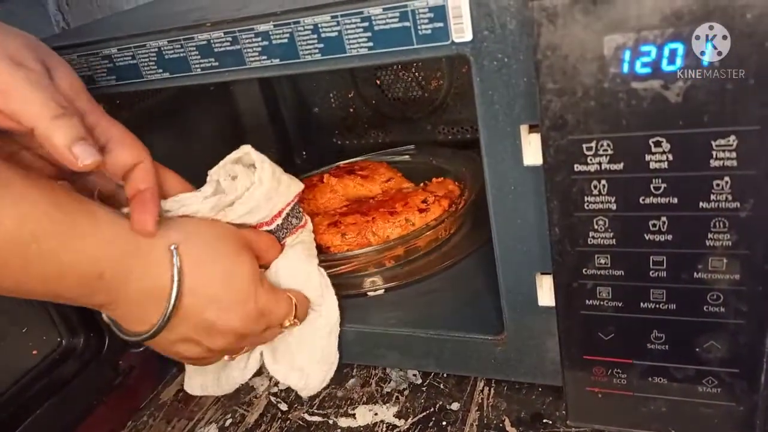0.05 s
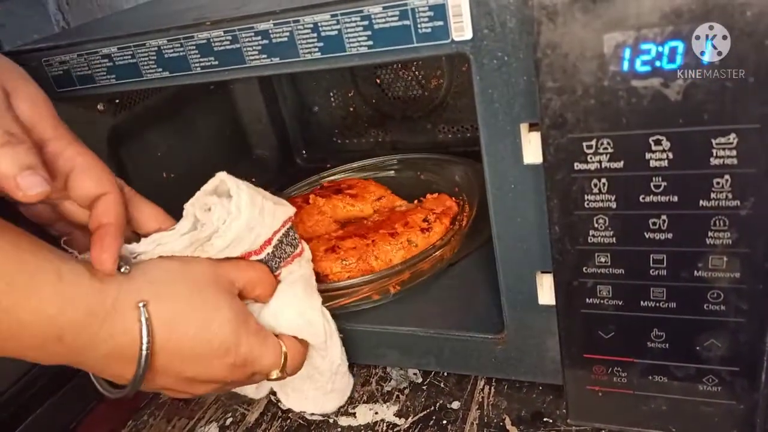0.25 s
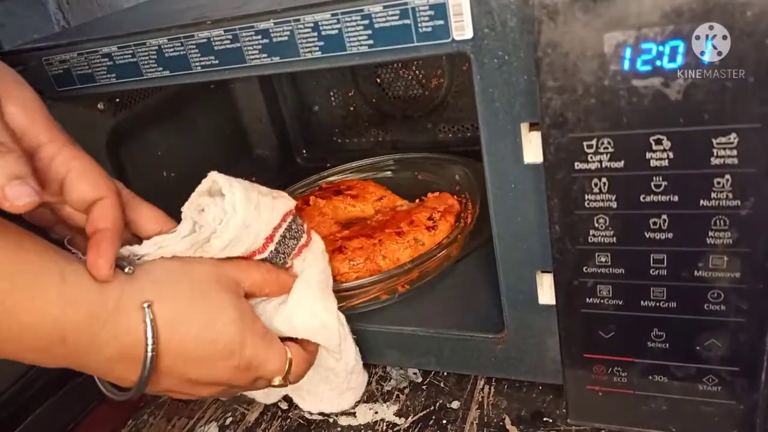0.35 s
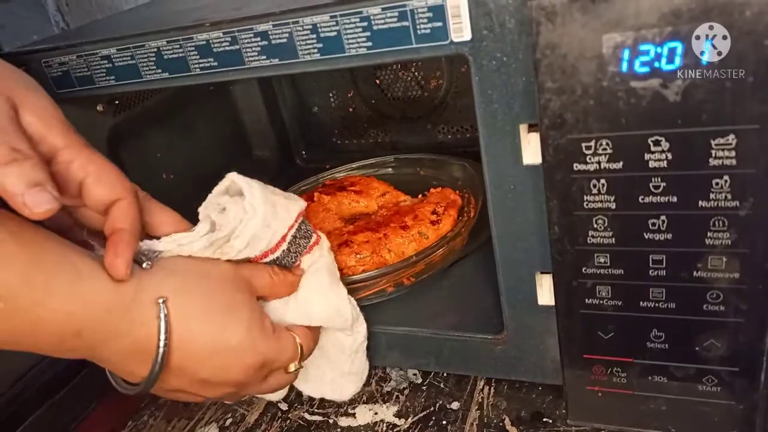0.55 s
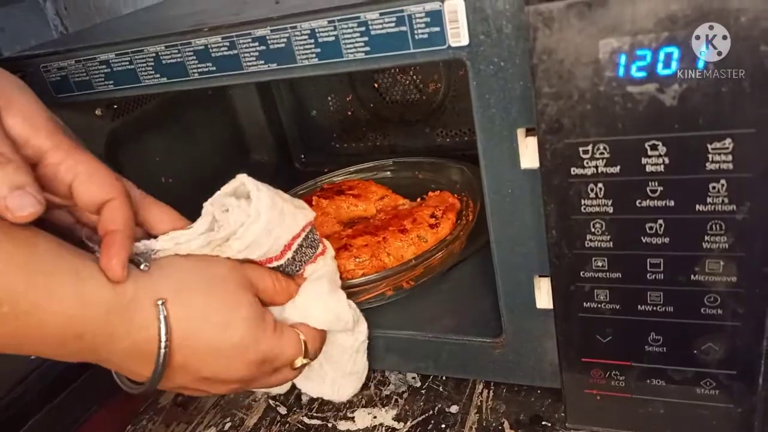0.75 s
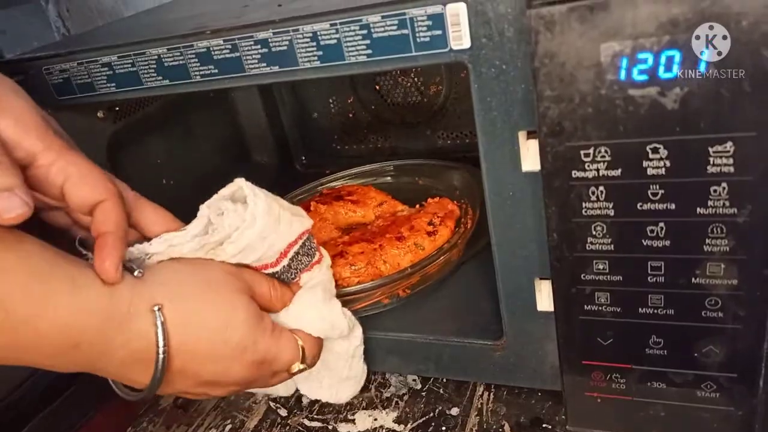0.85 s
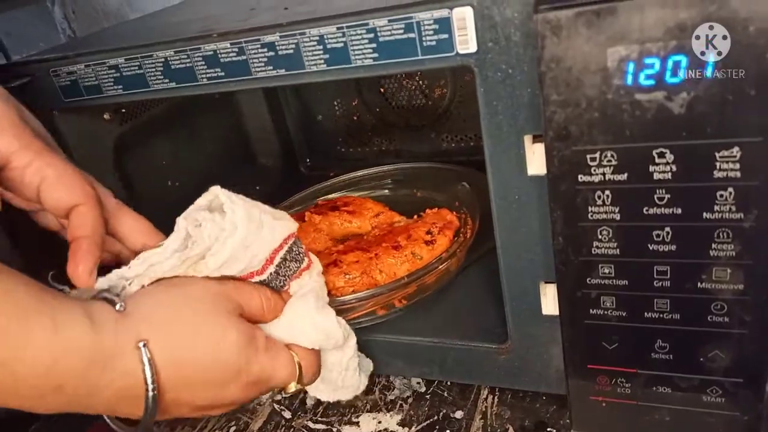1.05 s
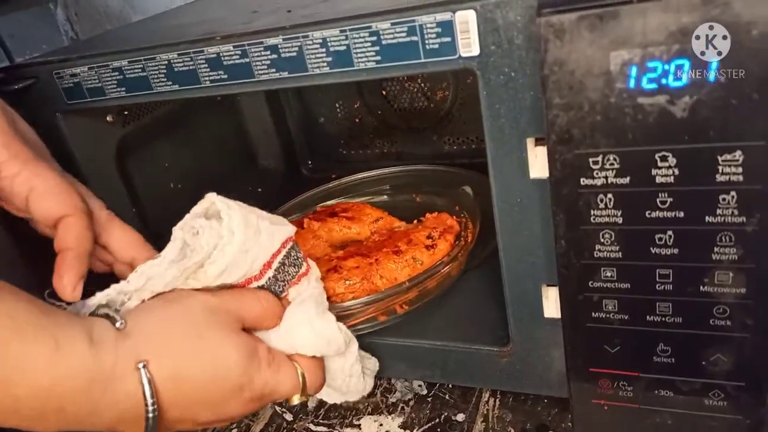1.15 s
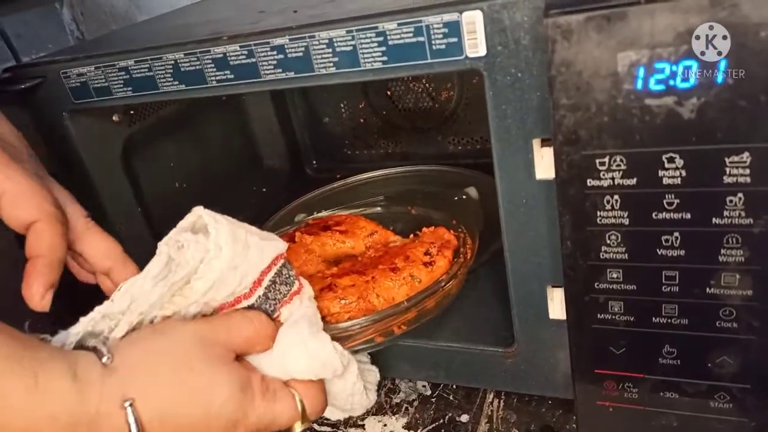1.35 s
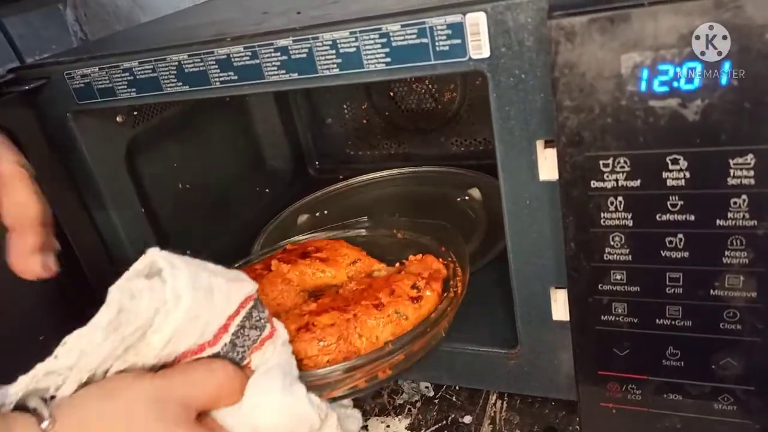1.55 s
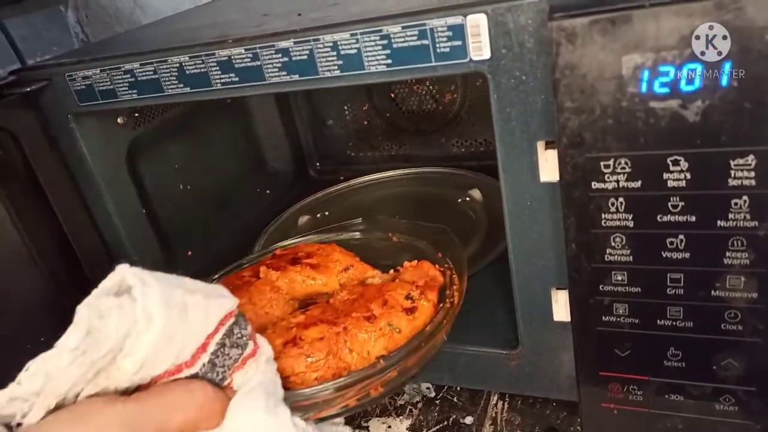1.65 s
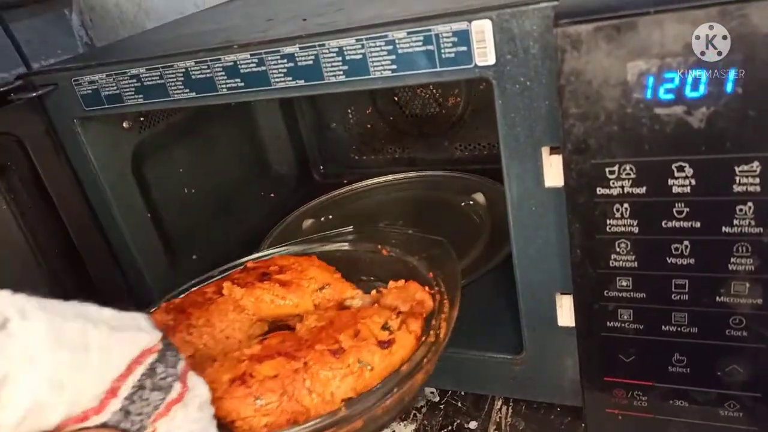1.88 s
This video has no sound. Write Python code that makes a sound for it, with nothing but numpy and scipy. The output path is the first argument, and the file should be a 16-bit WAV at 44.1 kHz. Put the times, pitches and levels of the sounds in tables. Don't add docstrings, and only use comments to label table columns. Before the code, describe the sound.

A sharp, hard clack in a kitchen, then a glass dish scrapes and knocks on an oven sill

```python
import sys
import numpy as np
from scipy import signal
from scipy.fft import rfft, irfft
from scipy.io import wavfile
from scipy.ndimage import uniform_filter1d

SR = 44100
rng = np.random.default_rng(int(sys.argv[2]) if len(sys.argv) > 2 else 0)


def volts_from_db(level):
    exponent = np.asarray(level, float) / 20
    return 10 ** exponent


def unload_wav(signal):
    wavfile.write(
        sys.argv[1],
        SR,
        np.round(np.clip(np.atleast_2d(signal).T, -1, 1) * 32767).astype(np.int16),
    )


N = 83790

RISE_S = 0.00083

# f/Hz, density/[dB per Hz]
HARD_CRACK = [(250, -28), (570, 0), (5100, -2.5), (8400, -15), (9000, -29), (11000, -22), (12800, -13),
              (15000, -46)]


def evened(x):
    return x / np.sqrt(np.mean(x ** 2) + 1e-20)


def read(points, hz):
    f, value = np.transpose(points)
    return np.interp(np.log(hz + 1), np.log(f + 1), value)


def colour(points):
    db = read(points, np.fft.rfftfreq(4096, 1 / SR))
    both_sides_db = np.r_[db, db[-2:0:-1]]
    log_gain = np.log(volts_from_db(np.maximum(both_sides_db, -100)))
    phase = -signal.hilbert(log_gain).imag
    return np.fft.ifft(np.exp(log_gain + 1j * phase)).real[:1024]


def ring(modes):
    twin_spread, twin_db, longest_t60_s = 0.034, -12.5, 0.84
    t = np.arange(SR // 2) / SR
    detune = twin_spread * rng.uniform(0.35, 1, len(modes)) * rng.choice([-1, 1], len(modes))
    total = 0
    for (hz, db, t60_s), shift in zip(modes, detune):
        main = np.sin(2 * np.pi * hz * t)
        twin = volts_from_db(twin_db) * np.sin(2 * np.pi * hz * (1 + shift) * t)
        decay = volts_from_db(db - 60 * t / np.clip(t60_s, 0.01, longest_t60_s))
        total = total + decay * (main + twin)
    return (1 - np.exp(-t / RISE_S)) * total


def hits(contacts, modes, crack, crack_db):
    rough_share, ring_send_db = 0.59, -3.5
    t = np.arange(N) / SR
    noise = rng.standard_normal(N)
    click, wake = np.zeros(N), np.zeros(N)
    for s, db, length_s in contacts:
        age = np.maximum(t - s, 0)
        envelope = (1 - np.exp(-age / RISE_S)) * np.exp(-age / length_s)
        wake += volts_from_db(db) * noise * envelope / np.sqrt(length_s * SR)
        click += volts_from_db(db) * np.sinc((t - s) * SR)
    body, edge = ring(modes), colour(crack)
    push = click + rough_share * wake
    rung = signal.fftconvolve(push, body / abs(body).max())[:N]
    cracked = signal.fftconvolve(wake, volts_from_db(crack_db) * 3 * edge / np.linalg.norm(edge))[:N]
    return np.array([rung + cracked, volts_from_db(ring_send_db) * rung + cracked])


def pressed(curve):
    s, db = np.transpose(curve)
    return volts_from_db(np.interp(np.arange(N) / SR, s, db, -99, -99))


def friction(curve, peaks, slips_per_s, spread_db):
    draw = rng.random((N, 3))
    happens = draw[:, 0] < slips_per_s / SR
    strength = volts_from_db(-spread_db * np.log(draw[:, 2] + 0.024))
    slips = happens * np.sign(draw[:, 1] - 0.5) * strength
    t = np.arange(SR // 4) / SR
    body = 0
    for hz, width_hz, db in peaks:
        decay = np.exp(-np.pi * width_hz * t)
        body = body + volts_from_db(db) * np.sqrt(width_hz) * decay * np.sin(2 * np.pi * hz * t)
    return evened(signal.fftconvolve(slips, body)[:N]) * pressed(curve)


def hum():
    # f/Hz, density/[dB per Hz]
    spectrum = [(45, -7), (62, 21.5), (100, -1.6), (300, -3.5), (900, -8.5), (2200, -18.5), (4000, -24),
                (9000, -30)]
    # f/Hz, likeness/[0..1]
    likeness = [(30, 0.31), (100, 1), (400, 0.85), (1500, 0.24), (5000, 0.18), (12000, 0.12)]
    level_db, lead_samples = -45.5, 19.63
    frames, hz = N // 256 + 5, np.fft.rfftfreq(1024, 1 / SR)
    a, b, c, d, patches = rng.standard_normal((frames, 513, 5)).T
    patches = uniform_filter1d(patches, size=10, axis=0)
    patches = evened(uniform_filter1d(patches, size=12, axis=1))
    same = np.clip(read(likeness, hz), -1, 1)[:, None]
    left, other = a + 1j * b, c + 1j * d
    lag = np.exp(-2j * np.pi * hz * lead_samples / SR)[:, None]
    z = np.array([left, same * left * lag + np.sqrt(1 - same ** 2) * other])
    z = z * volts_from_db(read(spectrum, hz)[:, None] + 1.3 * patches)
    return volts_from_db(level_db) * evened(signal.istft(z, nperseg=1024, noverlap=768)[1][:, :N])


def cabinet():
    # t/s, level/dB
    load = [(0.0, -36), (0.026, -38.5), (0.074, -47.5), (0.232, -40), (0.285, -29.5), (0.345, -31),
            (0.432, -41.5), (0.608, -43), (0.792, -52.5), (1.01, -46), (1.068, -38.5), (1.18, -51.5),
            (1.2, -38), (1.444, -50), (1.476, -34.5), (1.528, -44), (1.624, -66), (1.9, -47.5)]
    # f/Hz, width/Hz, level/dB
    panels = [(221, 22, 3.5), (256.3, 8.3, -0.2), (327, 92, 2), (470, 110, 1), (538, 28, -9.5),
              (597, 55, -5), (779, 57, -6)]
    # t/s, peak/dB, contact/s
    thumps = [(0.003, -24.5, 0.0031), (0.024, -30.5, 0.0016), (0.238, -25.5, 0.0028), (0.256, -24, 0.0049),
              (0.29, -24.5, 0.0039), (0.304, -21.5, 0.0056), (.331, -20.5, 0.0028), (0.352, -30.5, 0.0041),
              (.385, -45, 0.0024), (1.066, -43.5, 0.0026)]
    # f/Hz, level/dB, t60/s
    thump_modes = [(253.8, 11, 0.13), (351, -8.5, 0.15), (500, -4.5, 0.085), (597, 5.5, 0.11),
                   (850, -14.5, 0.066)]
    # t/s, peak/dB, contact/s
    landings = [(.575, -35.5, .01), (.61, -38.5, 0.011), (1.09, -36, 0.0023), (1.199, -35.5, 0.0036),
                (1.303, -40.5, 0.0081), (1.471, -37, 0.002)]
    # f/Hz, level/dB, t60/s
    floor_modes = [(500, -0.2, 0.64), (612, -3, 0.48)]
    rumble = friction(load, panels, 2500, 0.78)
    rumble = rumble + hits(thumps, thump_modes, HARD_CRACK, -66)
    return rumble + hits(landings, floor_modes, HARD_CRACK, -31.5)


def slide():
    # t/s, pressure/dB
    pressure = [(0.1, -57), (0.15, -49.5), (0.175, -40), (0.194, -42.5), (0.21, -36.5), (0.228, -40),
                (0.25, -30), (0.272, -38.5)]
    # first f/Hz, last f/Hz, width/Hz, level/dB
    glides = [(690, 625, 30, 3), (1100, 1170, 30, -2), (1450, 1450, 120, -16), (1950, 1900, 400, -12),
              (2470, 2400, 300, -16), (3500, 3500, 500, -18)]
    t, total = np.arange(N) / SR, 0
    start_end_s = np.transpose(pressure)[0][[0, -1]]
    slips = rng.standard_normal(N) ** 3
    for first_hz, last_hz, width_hz, db in glides:
        hz = np.interp(t, start_end_s, [first_hz, last_hz])
        turn = np.exp(2j * np.pi * np.cumsum(hz) / SR)
        r = np.exp(-np.pi * width_hz / SR)
        swing = signal.lfilter([1], [1, -2 * r, r * r], slips / turn)
        total = total + volts_from_db(db) * evened((turn * swing).real)
    return evened(total) * pressed(pressure)


def clack():
    # t/s, peak/dB, contact/s
    touches = [(0.237, -26, 0.0045), (0.241, -21.5, 0.018), (0.249, -34, 0.016), (.265, -32.5, 0.0048)]
    # f/Hz, level/dB, t60/s
    touch_modes = [(758, -9, 0.043), (1655, -3.5, 0.038), (2320, -11, 0.017), (2720, -16, 0.022),
                   (3600, -8.5, .02), (4600, -16, 0.053)]
    # t/s, peak/dB, contact/s
    blows = [
        (0.274, -9, 0.003),
        (0.2783, -3.5, 0.0044),
        (0.287, -14.5, 0.0019),
        (0.296, -14.5, 0.00043),
        (0.3055, -18, 0.0056),
    ]
    # f/Hz, level/dB, t60/s
    blow_modes = [(563.5, -5, 0.16), (602, -6.5, 0.2), (783, -4, 0.2), (1032, -12, 0.067),
                  (1152, -5.5, 0.066), (1493, -9, 0.07), (1694, -8.5, 0.12), (1753, 11.5, 0.036),
                  (2234, -6.5, 0.2), (2670, 1.5, 0.04), (3620, 7, 0.032), (4130, -1.5, 0.036),
                  (4730, -13, 0.057)]
    # t/s, peak/dB, contact/s
    edge_ticks = [(0.2748, -12.5, .002), (0.2845, -16.5, 0.0026), (0.297, -28, .003)]
    # f/Hz, level/dB, t60/s
    edge_modes = [(6263, -6, 0.05), (6490, 5, 0.018), (7585, -11.5, 0.11), (8100, 0, 0.038),
                  (12020, -13, 0.068), (13750, -12, 0.044)]
    landing = hits(blows, blow_modes, HARD_CRACK, 9) + hits(touches, touch_modes, HARD_CRACK, 1.5)
    return landing + hits(edge_ticks, edge_modes, HARD_CRACK, -13.5)


def dish():
    # t/s, pressure/dB
    drag = [(0.93, -54.5), (0.98, -56), (1.082, -44.5), (1.176, -64), (1.202, -43), (1.22, -68),
            (1.25, -44.5), (1.288, -61), (1.3, -57)]
    # f/Hz, width/Hz, level/dB
    drag_modes = [(955, 21, -2), (1085, 34, -17), (1640, 240, 6), (1770, 70, -5.5), (1880, 84, -31),
                  (3030, 57, -10), (3530, 140, -6)]
    # t/s, peak/dB, contact/s,
    # f/Hz, t60/s
    catches = [(1.001, -45.5, 0.0022, 1160, 0.028), (1.021, -36.5, 0.003, 2055, 0.017),
               (1.054, -39.5, 0.0064, 1160, 0.042), (1.058, -47, .004, 1780, 0.11),
               (1.075, -48, 0.0016, 3780, .04), (1.078, -35, 0.0032, 1870, 0.078),
               (1.096, -36.5, 0.0027, 2010, 0.02), (1.109, -36, 0.0033, 1640, 0.028),
               (1.183, -43, 0.0022, 1450, .02), (1.199, -37, 0.0022, 947, 0.017),
               (1.204, -40, 0.004, 1740, .06), (1.232, -33, 0.0018, 1350, 0.019),
               (1.503, -33, .003, 1780, 0.072), (1.519, -42, .02, 881, 0.071)]
    # f/Hz, density/[dB per Hz]
    catch_crack = [(300, -15), (600, -5), (1100, 6), (1600, 7.5), (2200, -2.5), (2700, -19), (3700, -15),
                   (6000, -27)]
    # t/s, peak/dB, contact/s
    rim = [(1.2457, -25, 0.0012)]
    side = [(1.303, -21, 0.0073)]
    base = [
        (1.4701, -16.5, 0.011),
        (1.476, -20, 0.0047),
    ]
    # f/Hz, level/dB, t60/s
    rim_modes = [(1260, 2.5, 0.022), (1470, -2, 0.046), (1795, 5, 0.073), (3190, -22.5, 0.11),
                 (3670, -9.5, 0.092)]
    side_modes = [(1217, 2, 0.073), (1400, -20, 0.13), (1722, -9, 0.11), (1972, 0, 0.092),
                  (2510, -18.5, 0.12), (3290, -25.5, 0.4), (3400, -18.5, 0.086), (5270, -12.5, 0.041)]
    base_modes = [(867, -4, 0.063), (1146, -1.5, 0.047), (1780, 3, 0.045), (2024, -2, 0.035),
                  (2438, -8.5, 0.073), (3113, -15.5, 0.086), (3250, -11, 0.031), (4670, -20.5, 0.039),
                  (5395, -18.5, 0.11), (7530, -29.5, 0.04)]
    # f/Hz, density/[dB per Hz]
    knock_crack = [(300, -31), (700, 4), (1500, 9.5), (2300, -16), (3300, -4), (5000, -11), (9000, -29.5)]
    glass = friction(drag, drag_modes, 550, 4.0)
    for s, db, length_s, hz, t60_s in catches:
        glass = glass + hits([(s, db, length_s)], [(hz, 0, t60_s)], catch_crack, 8.7)
    for knocks, modes in ((rim, rim_modes), (side, side_modes), (base, base_modes)):
        glass = glass + hits(knocks, modes, knock_crack, 0)
    return glass


def room(x):
    # f/Hz, t60/s
    decay = [(250, 0.49), (1000, 0.46), (4000, 0.32), (8000, 0.29), (12000, 0.32)]
    taps = np.zeros((2, SR // 2))
    jitter = rng.integers(0, 20, (2, (SR // 2 - 201) // 20))
    at = np.arange(200, SR // 2 - 20, 20) + jitter
    np.put_along_axis(taps, at, rng.choice([-1., 1.], at.shape), 1)
    hz, t, z = signal.stft(taps, SR, nperseg=256)
    fade = volts_from_db(-60 * t / read(decay, hz)[:, None])
    tail = signal.istft(z * fade, SR, nperseg=256)[1]
    return signal.fftconvolve(x[None], tail / np.linalg.norm(tail[0]), axes=1)[:, :N]


def place(x, pan, lead_samples):
    z, f = rfft(x), np.fft.rfftfreq(N)
    half = volts_from_db(read(pan, f * SR) / 2)
    delay = np.exp(-2j * np.pi * f * lead_samples)
    return np.array([irfft(z * half, N), irfft(z / half * delay, N)])


def scene():
    # f/Hz, level/dB
    clack_pan = [(60, -18), (180, -6), (550, -0.5), (1650, -5), (2800, 1), (5000, 10.5), (8200, 7.5),
                 (12000, -1)]
    dish_pan = [(60, -19), (240, 11), (950, -15), (3770, 6), (15000, 22)]
    rumble = cabinet()
    landing = clack() + volts_from_db([[0], [-12]]) * slide()
    glass = dish()
    near = place(landing[0], clack_pan, 3.93) + place(glass[0], dish_pan, 3.7)
    near = near + place(rumble[0], [(200, -0.3), (800, 0.2)], 6.2)
    wet = room(volts_from_db(-8.5) * landing[1] + volts_from_db(-6.5) * glass[1] + volts_from_db(-17) * rumble[1])
    low_cut = signal.butter(4, 229, "high", fs=SR, output="sos")
    return signal.sosfilt(low_cut, near + wet) + hum()


def low_pass(x):
    return signal.sosfilt(signal.butter(12, 16430, fs=SR, output="sos"), x)


def record(dry):
    # f/Hz, level/dB
    mic = [(4600, -0.5), (5300, -7.5), (6300, 4), (8400, 1), (8800, -15.5), (11250, -21), (11600, -11.5),
           (15300, -5)]
    ceiling = 1.1
    limited = ceiling * np.tanh(dry / ceiling)
    low_cut = signal.butter(4, 95.6, "high", fs=SR, output="sos")
    cut = signal.sosfilt(low_cut, limited)
    taps = np.convolve(colour(mic), signal.firwin(255, 15500, fs=SR))
    mix = signal.fftconvolve(cut, taps[None], axes=1)[:, 127:N + 127]
    return low_pass(mix)


dry = scene()
out = record(dry)
unload_wav(out)
```